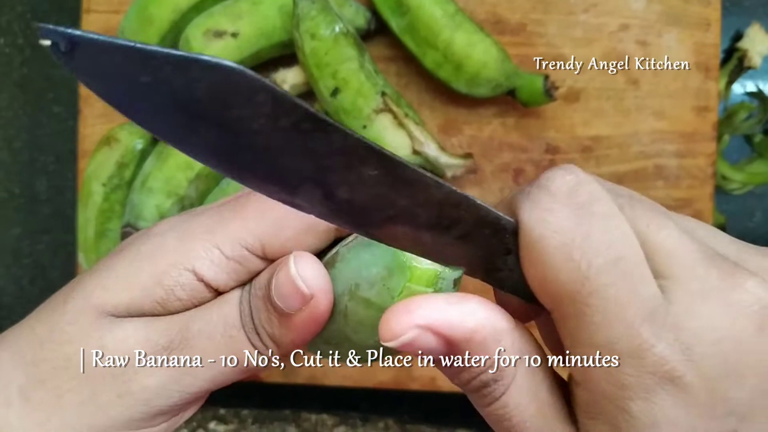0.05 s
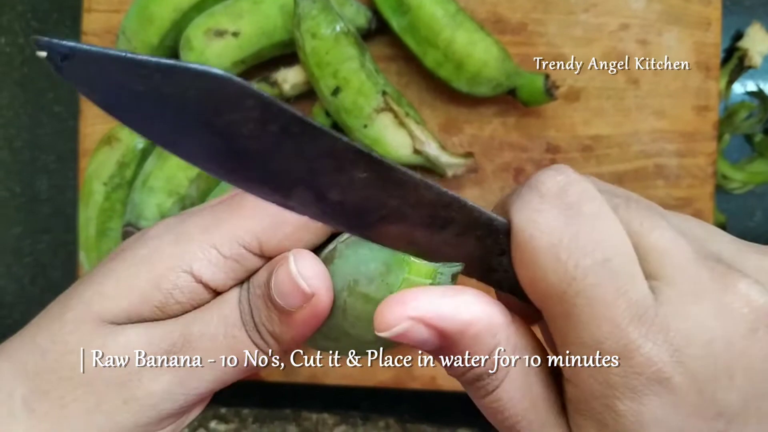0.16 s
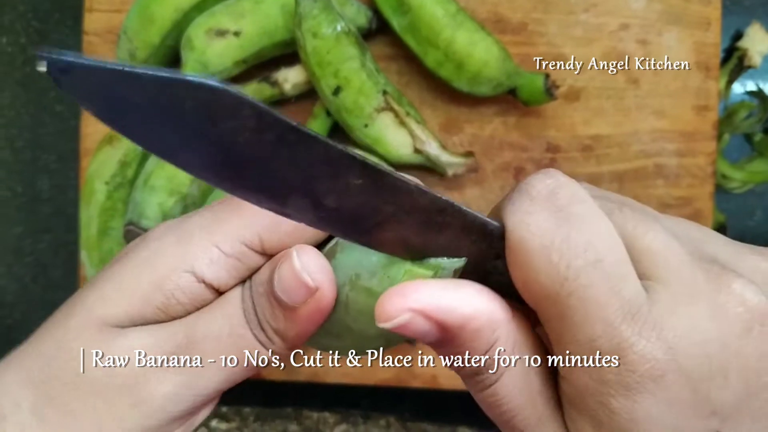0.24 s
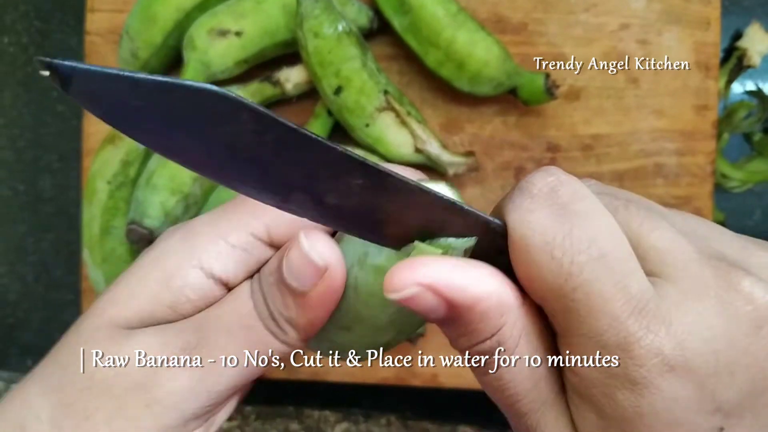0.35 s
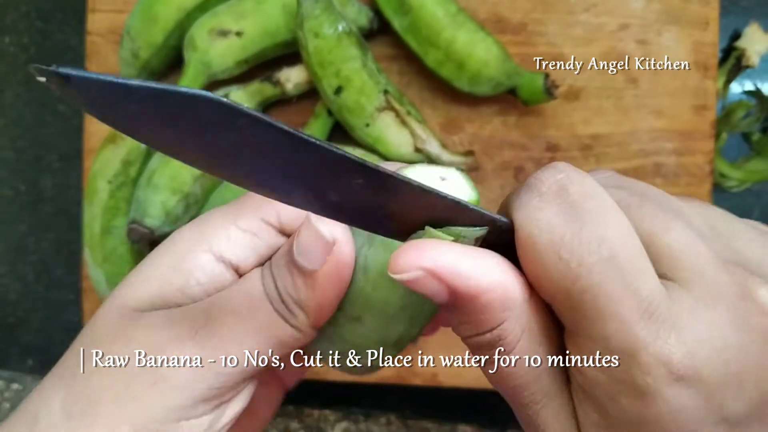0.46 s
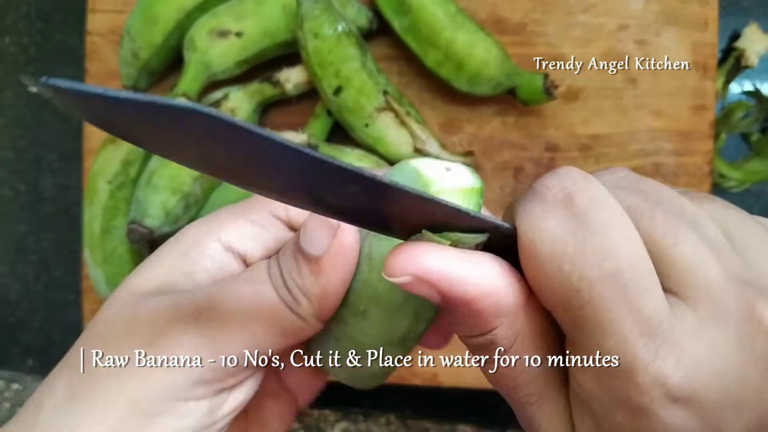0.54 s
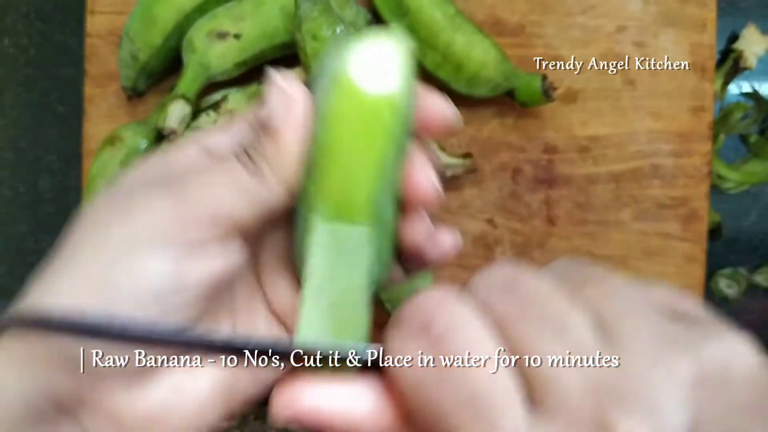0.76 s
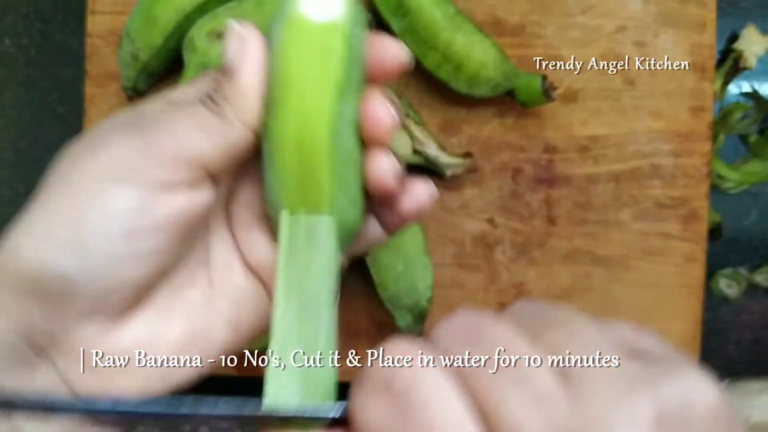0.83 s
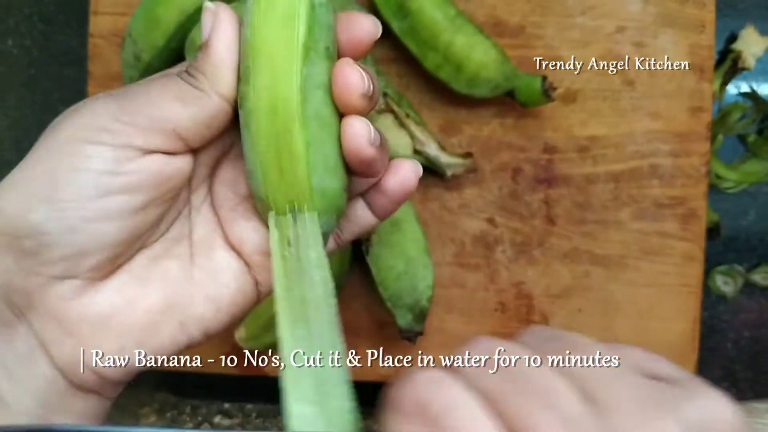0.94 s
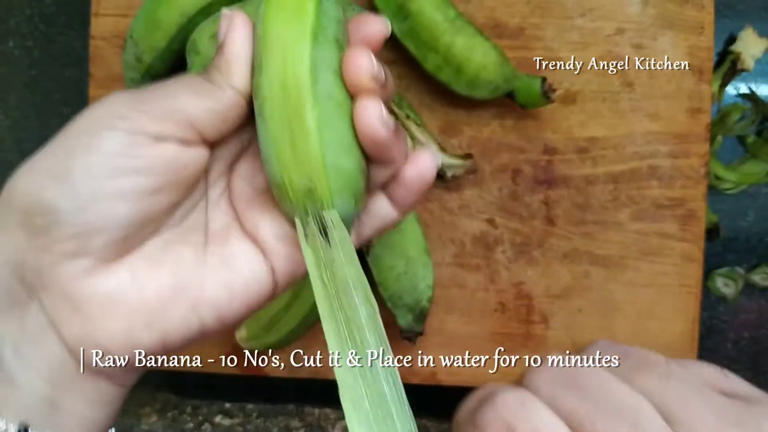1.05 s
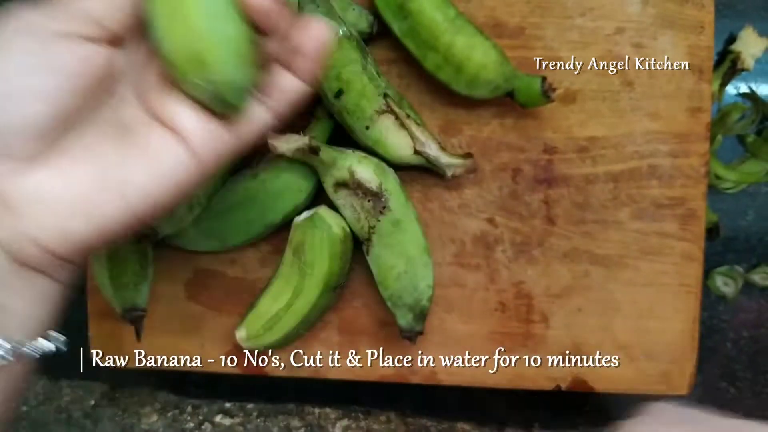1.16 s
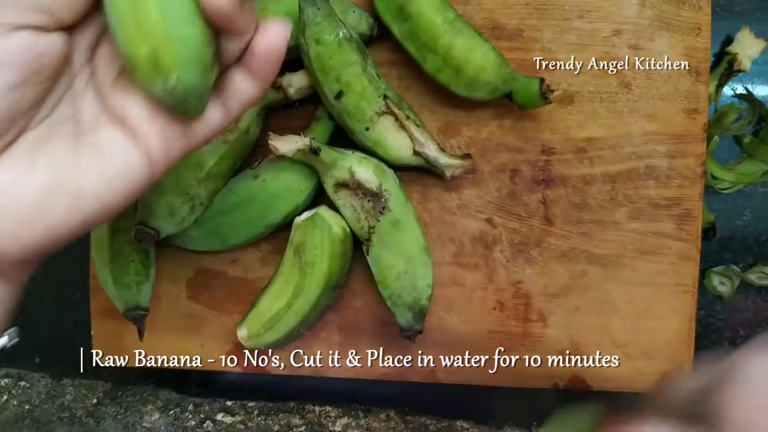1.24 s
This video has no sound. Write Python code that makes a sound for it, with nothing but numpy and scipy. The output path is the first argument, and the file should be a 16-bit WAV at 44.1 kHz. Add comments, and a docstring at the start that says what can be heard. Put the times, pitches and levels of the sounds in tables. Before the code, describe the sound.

Close, crisp crackle and wet tearing as a knife strips skin from a green banana.

```python
"""A raw banana peeled with a knife, close to a stereo microphone in a quiet kitchen.
Fingers rub on the skin, the blade bites in and snaps fibres, and a strip is pulled down the fruit with a
wet hiss of tiny bursting cells, then rings briefly and rips off its end. Underneath lie room noise, the
soft rumble of the hands, a faint tone and a low mains hum that swells and fades."""
import sys
import numpy as np
from scipy import signal
from scipy.fft import rfft, irfft, next_fast_len
from scipy.io import wavfile

SR = 44100
rng = np.random.default_rng(int(sys.argv[2]) if len(sys.argv) > 2 else 0)


def unload_wav(signal):
    """Save mono or channel-first audio to the path in sys.argv[1] as 16-bit WAV at rate SR, clipped to [-1, 1]."""
    wavfile.write(
        sys.argv[1],
        SR,
        np.round(np.clip(np.atleast_2d(signal).T, -1, 1) * 32767).astype(np.int16),
    )


N = 57330
T = np.arange(N) / SR
SIZE = next_fast_len(2 * N)
HZ = np.maximum(np.arange(SIZE // 2 + 1) * SR / SIZE, 1)


def from_db(db):
    """Decibels to gain."""
    return 10 ** (np.asarray(db) / 20)


def rms_one(x):
    """Scale to rms 1."""
    return x / np.sqrt(np.mean(x ** 2) + 1e-20)


def level(rows):
    """Gain over time from (time [s], level [dB]) rows, silent outside them."""
    times, db = np.transpose(rows)
    return from_db(np.interp(T, times, db, left=-120, right=-120))


def per_hz(points):
    """A (frequency [Hz], value) table read at every frequency."""
    hz, value = np.transpose(points)
    return np.interp(np.log(HZ), np.log(hz), value)


def coloured(x, spectrum):
    """Minimum-phase filter of the given shape that keeps the power of white noise."""
    cepstrum = irfft(np.log(rms_one(from_db(per_hz(spectrum)))), SIZE)
    cepstrum[1:SIZE // 2] *= 2
    cepstrum[SIZE // 2 + 1:] = 0
    return irfft(rfft(x, SIZE) * np.exp(rfft(cepstrum)), SIZE)[..., :N]


def drift(rate_hz):
    """Random wander of rms 1, mostly slower than the given rate."""
    noise = rfft(rng.standard_normal(SIZE))
    return rms_one(irfft(noise / (1 + (HZ / rate_hz) ** 2), SIZE)[:N])


def crackle(effort, colour, clicks_per_s, spread_db, clump_db):
    """Tiny clicks of uneven size, as of bursting cells, denser and louder as the effort grows."""
    gain = level(effort)
    chance = np.clip(clicks_per_s / SR * np.sqrt(gain / gain.max()), 1e-4, 1)
    sizes = rms_one(from_db(spread_db * np.minimum(rng.exponential(1, N), 4)))
    signs = rng.choice([-1, 1], N)
    clicks = sizes * signs * (rng.random(N) < chance) / np.sqrt(chance)
    clumps = rms_one(from_db(clump_db * drift(140)))
    return coloured(clicks * gain * clumps, colour)


# the kitchen's background: (frequency [Hz], level [dB])
ROOM_NOISE_COLOUR = [(20, -3), (30, -2), (45, -10), (80, -4), (125, 0.35), (170, -6.5), (250, -12),
                     (380, -10), (700, -18), (2000, -22), (4000, -32), (8000, -36.5), (16000, -39)]
# its likeness across the microphone: (frequency [Hz], left-right correlation [0-1])
ROOM_NOISE_LIKENESS = [(100, 0.91), (300, 0.85), (600, 0.57), (1200, 0), (4000, 0.4), (8000, 1)]

def room_noise(level_db=-50.5):
    """Steady noise all around the microphone, alike on both sides in the bass and high treble."""
    mid, side = rfft(rng.standard_normal((2, SIZE)))
    alike = per_hz(ROOM_NOISE_LIKENESS)
    stereo = np.sqrt(1 + alike) * mid + np.sqrt(1 - alike) * side * [[1], [-1]]
    noise = irfft(stereo * from_db(per_hz(ROOM_NOISE_COLOUR)), SIZE)[:, :N]
    return from_db(level_db) * rms_one(noise)


# hum at the microphone: (time [s], level [dB])
HUM_LEVEL = [(0, -56), (0.16, -57), (0.34, -71), (0.398, -37), (0.448, -33.5), (0.55, -32.5), (0.7, -31),
             (0.80, -32.5), (0.88, -44.5), (0.95, -48), (1.158, -50), (1.3, -56)]

def mains_hum(hz=99.74, waver_db=0.3):
    """A pure low mains hum in the centre that swells, wavers and fades."""
    db = np.interp(T, *np.transpose(HUM_LEVEL)) + waver_db * drift(11.0)
    return from_db(db) * np.sqrt(2) * np.sin(2 * np.pi * hz * T)


# hands close to the microphone: (time [s], level [dB])
RUMBLE_LEVEL = [(0, -49), (0.15, -53), (0.21, -47), (0.26, -49.5), (0.42, -43.5), (0.74, -48),
                (0.795, -39.5), (0.86, -45), (1.2, -61)]
# their rumble: (frequency [Hz], level [dB])
RUMBLE_COLOUR = [(20, 5.5), (32, 7.5), (60, -10), (130, 5.5), (260, -19.5), (450, -16.5), (900, -29),
                 (16000, -59)]

def hand_rumble():
    """The hands shift their hold with a soft, lumpy low noise."""
    return level(RUMBLE_LEVEL) * rms_one(coloured(rng.standard_normal(N), RUMBLE_COLOUR))


# fingers on the skin: (time [s], level [dB])
RUB_LEVEL = [(0.03, -56), (0.11, -59.5), (0.163, -48), (0.182, -43), (0.218, -45), (0.24, -50), (0.28, -48),
             (0.34, -57.5), (0.45, -91)]
# their friction: (frequency [Hz], level [dB])
RUB_COLOUR = [(200, -18), (600, 1), (950, 4), (1900, -3.5), (2700, 3), (3500, 2.5), (4100, -7.5),
              (6800, -8.5), (9000, -11), (16000, -35)]

def finger_rub():
    """Fingers rub on the skin in a fine, even grain as the grip shifts."""
    return crackle(RUB_LEVEL, RUB_COLOUR, clicks_per_s=13000, spread_db=0.5, clump_db=2.0)


# the blade in the skin: (time [s], level [dB])
BITE_LEVEL = [(0.09, -64), (0.108, -52.5), (0.136, -59.5), (0.152, -48), (0.188, -59.5), (0.21, -45.5),
              (0.246, -61), (0.26, -44.5), (0.315, -48.5), (0.345, -40), (0.37, -43), (0.39, -44.5),
              (0.446, -48), (0.464, -39), (0.49, -42.5), (0.54, -51), (0.6, -42)]
# its bright crunch: (frequency [Hz], level [dB])
BITE_COLOUR = [(500, -10), (2500, -3), (5200, -5), (6300, -0.5), (9500, 2.5), (12000, 0), (15000, 4),
               (16000, -0.5)]

def blade_bite():
    """The blade works into the skin and bursts cells in rough clumps."""
    return crackle(BITE_LEVEL, BITE_COLOUR, clicks_per_s=11000, spread_db=3.5, clump_db=2.15)


# tough fibres breaking: (time [s], strength [dB], left minus right [dB])
FIBRE_SNAPS = [(0.2697, -28, -11), (0.345, -21.5, -6), (0.3928, -22, -4), (0.4527, -21, 17),
               (0.4573, -13.5, -10.5), (0.4594, -19.5, 4), (0.4635, -28, -1), (0.5168, -33.5, 24),
               (0.5723, -20.5, 2), (0.8651, -35, -16), (0.9425, -29, -2), (0.9896, -23, -13),
               (1.057, -24.5, 7)]
# their click: (frequency [Hz], level [dB])
SNAP_COLOUR = [(500, -31), (2000, -12.5), (3000, 1.5), (4300, -30), (5500, 3), (7500, 1.5), (12000, 2.5),
               (16000, 1.5)]

def fibre_snaps(crumble=0.22, decay_s=0.002):
    """Each fibre breaks with one sharp click and a brief crumble."""
    out = np.zeros((2, N))
    age = T[:SR // 50]
    for time, db, pan_db in FIBRE_SNAPS:
        crack = crumble * rng.standard_normal(len(age)) * np.exp(-age / decay_s)
        crack[0] = 1  # the click
        start = int(time * SR)
        out[:, start:start + len(age)] += from_db([[db + pan_db / 2], [db - pan_db / 2]]) * crack
    return coloured(out, SNAP_COLOUR)


# the strip coming down the fruit: (time [s], level [dB])
PULL_LEVEL = [(0.556, -45), (0.569, -46.5), (0.574, -37.5), (0.604, -34), (0.655, -30.5), (0.69, -32),
              (0.73, -34), (0.762, -34), (0.82, -42), (0.905, -56)]
# its hiss while short: (frequency [Hz], level [dB])
PULL_COLOUR = [(400, -17), (1450, -14), (2400, -1.5), (3200, -5.5), (4400, 0), (6200, -0.5), (7900, 2),
               (11000, 0), (12500, -1.5), (14600, 3.5), (16000, -4.5)]
# the change once it is long: (frequency [Hz], gain [dB])
LONG_STRIP_CHANGE = [(2400, 1.5), (5000, 4), (6900, -2.5), (8400, -2.5), (11300, 0.5), (14000, -1.5)]

def strip_pull(long_from_s=0.72):
    """Cells burst in a wet hiss that switches from a short strip's colour to a long one's."""
    hiss = crackle(PULL_LEVEL, PULL_COLOUR, clicks_per_s=11000, spread_db=2.0, clump_db=1.3)
    return np.where(T > long_from_s, coloured(hiss, LONG_STRIP_CHANGE), hiss)


# a tone under the peeling: (time [s], level [dB])
TONE_LEVEL = [(0.62, -71), (0.86, -55.5), (1.02, -70)]

def faint_tone(hz=344):
    """A faint low tone fades in and out as the strip comes away."""
    return level(TONE_LEVEL) * np.sqrt(2) * np.sin(2 * np.pi * hz * T)


# the strip's end tearing: (time [s], level [dB])
RIP_LEVEL = [(0.91, -57.5), (0.94, -46.5), (0.96, -48), (0.985, -42.5), (1.015, -41), (1.036, -34),
             (1.054, -32.5), (1.066, -44.5), (1.09, -52.5), (1.16, -65.5)]
# its rasp: (frequency [Hz], level [dB])
RIP_COLOUR = [(400, -25), (1200, -12.5), (2200, -9), (2750, 2.5), (3500, -5), (5300, 0), (7000, 0),
              (10300, -4.5), (13500, -4.5), (16000, -9)]

def strip_rip():
    """The last cells burst as the strip rips off the end of the fruit."""
    return crackle(RIP_LEVEL, RIP_COLOUR, clicks_per_s=10000, spread_db=2.0, clump_db=0.0)


# the loosened strip ringing: (time [s], level [dB])
RING_LEVEL = [(1.005, -49), (1.034, -39), (1.068, -61.5)]

def strip_ring(hz=2620, width_hz=520):
    """The loosened strip rings briefly, hollow and narrow, just before it lets go."""
    radius = np.exp(-np.pi * width_hz / SR)
    poles = [1, -2 * radius * np.cos(2 * np.pi * hz / SR), radius ** 2]
    ring = rng.standard_normal(N)
    for _ in range(2):
        ring = signal.lfilter([1, 0, -1], poles, ring)
    return level(RING_LEVEL) * rms_one(ring)


def reflections(x, t60_s, gap_s=0.0015, renew_s=0.05):
    """A short diffuse tail on each side, its pattern renewed as hands and fruit move."""
    age, out = T[:SR // 5], np.zeros((2, N))
    decay = rms_one(from_db(-60 * age / t60_s) * (age > gap_s)) / np.sqrt(len(age))
    for time in np.arange(0, T[-1] + renew_s, renew_s):
        near = np.flatnonzero(abs(T - time) < renew_s)
        start = near[0]
        part = x[:, near] * np.cos(np.pi / 2 * (T[near] - time) / renew_s)
        response = decay * rng.standard_normal((2, len(age)))
        tail = signal.fftconvolve(part, response, axes=1)[:, :N - start]
        out[:, start:start + tail.shape[1]] += tail
    return out


def between_hands(x, echo_db=-13):
    """Short echoes between hands, blade and fruit give the tearing a shifting, wet ring."""
    gain = from_db(echo_db)
    echoes = reflections(x[None], t60_s=0.016)[0]
    return (x + gain * echoes) / np.sqrt(1 + gain ** 2)


# the kitchen's reflections against the direct sound: (frequency [Hz], level [dB])
REFLECTION_COLOUR = [(300, -3.5), (1500, 5), (3500, 0.5), (5500, 4), (7500, -15.5), (11500, -2.5),
                     (14500, -29)]
# the left side lags slightly in the lows and mids; in the treble both sides are in phase: (frequency [Hz],
# phase delay [ms])
LEFT_PHASE = [(300, 0.02), (1500, 0.097), (4200, .12), (7500, 0.125), (12000, 0.0883), (16000, 0.064)]
# direct sound at the microphone: (frequency [Hz], left minus right [dB])
DIRECT_BALANCE = [(600, 4.5), (3500, 1.5), (7500, -1), (9500, -1.5), (11600, -3.5), (14500, 0)]

def kitchen(x):
    """Sound reaches the close microphone directly, then as short reflections off the room."""
    phase = np.exp(-2j * np.pi * HZ * per_hz(LEFT_PHASE) / 1000 * [[1], [0]])
    balance = from_db(per_hz(DIRECT_BALANCE) / 2 * [[1], [-1]])
    direct = rfft(x, SIZE) * phase * balance
    wet = from_db(per_hz(REFLECTION_COLOUR))
    reflected = wet * rfft(reflections(x, t60_s=0.06), SIZE)
    return irfft((direct + reflected) / np.sqrt(1 + wet ** 2), SIZE)[:, :N]


def scene():
    """The peeling close up in the kitchen, over rumble, hum, a faint tone and room noise."""
    peel = between_hands(finger_rub() + blade_bite() + strip_pull() + strip_rip())
    banana = kitchen(peel + strip_ring() + fibre_snaps())
    return banana + hand_rumble() + mains_hum() + faint_tone() + room_noise()


def record(dry):
    """The highest treble is cut steeply."""
    cutoff_hz = 15900
    return irfft(rfft(dry, SIZE) / np.sqrt(1 + (HZ / cutoff_hz) ** 500), SIZE)[:, :N]


dry = scene()
out = record(dry)
unload_wav(out)
```